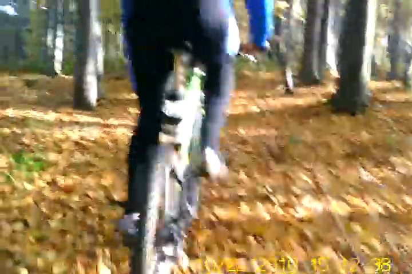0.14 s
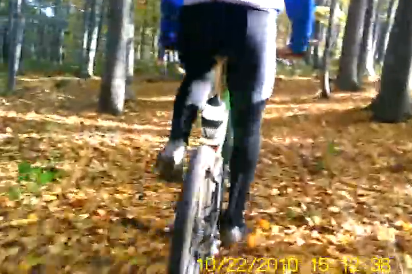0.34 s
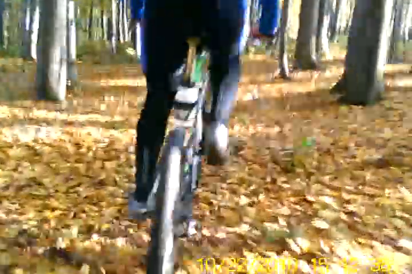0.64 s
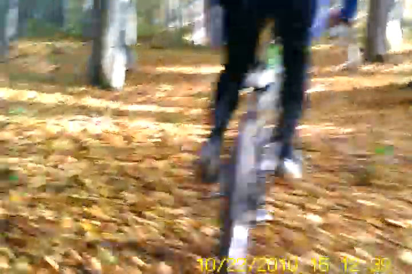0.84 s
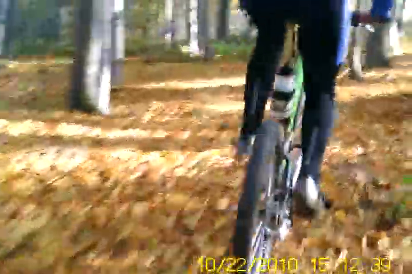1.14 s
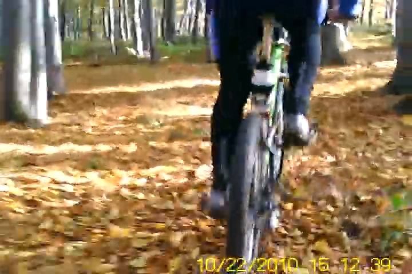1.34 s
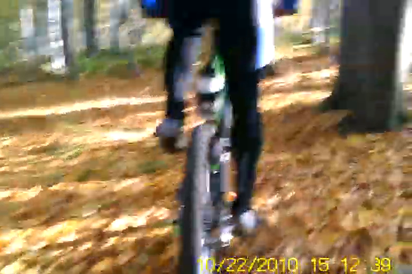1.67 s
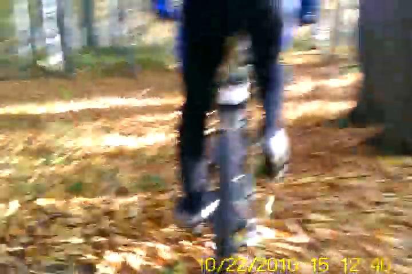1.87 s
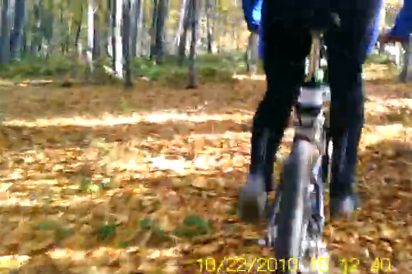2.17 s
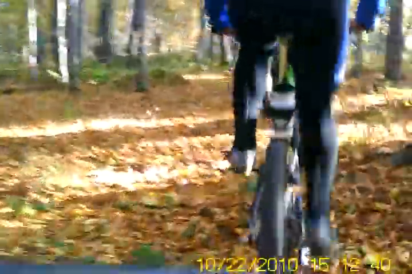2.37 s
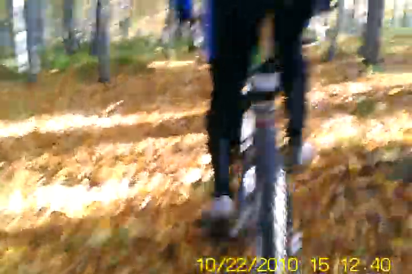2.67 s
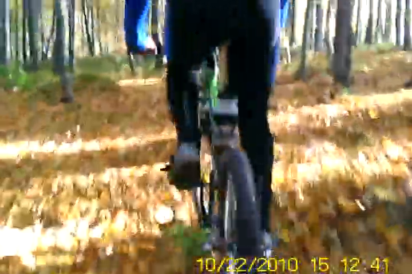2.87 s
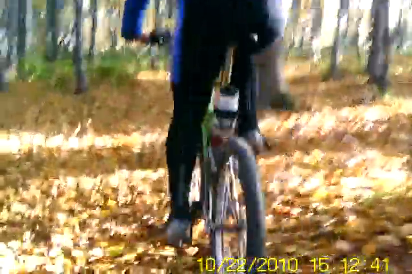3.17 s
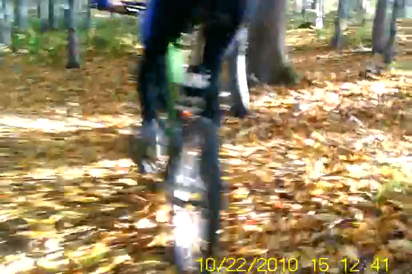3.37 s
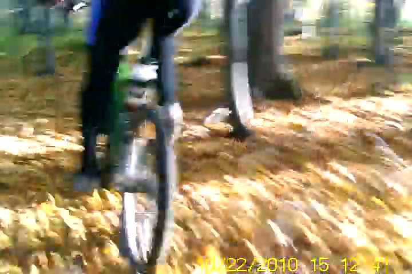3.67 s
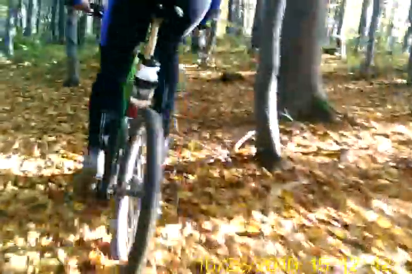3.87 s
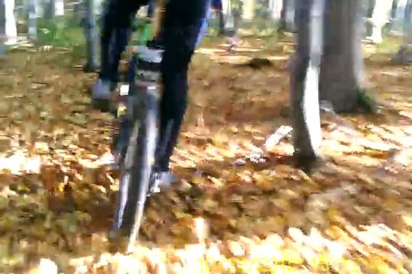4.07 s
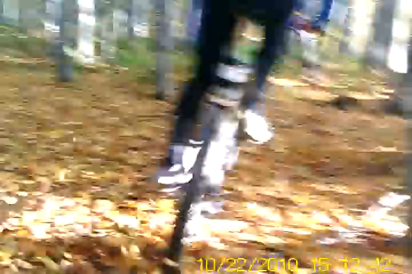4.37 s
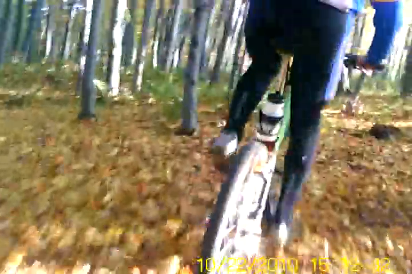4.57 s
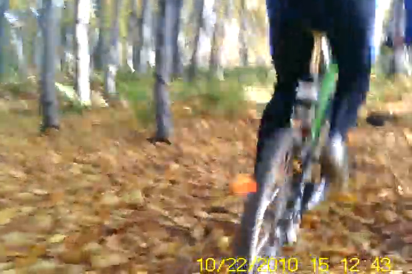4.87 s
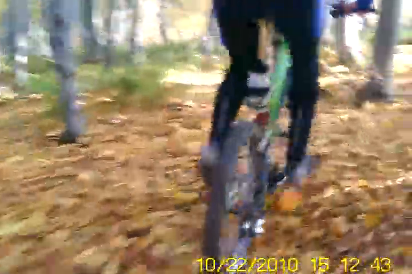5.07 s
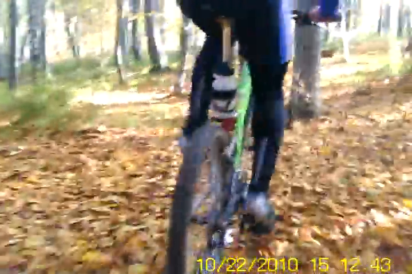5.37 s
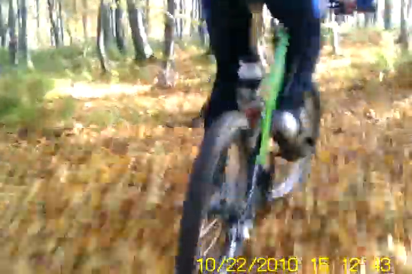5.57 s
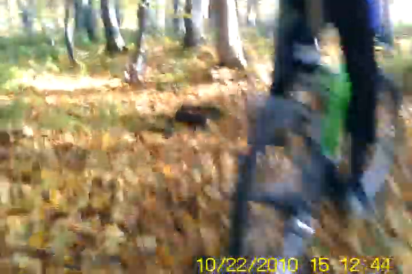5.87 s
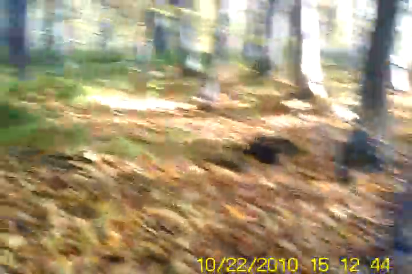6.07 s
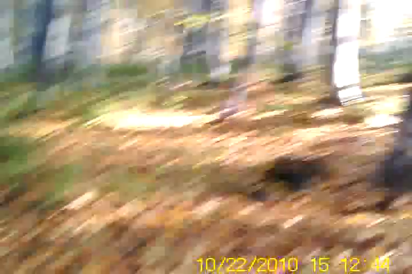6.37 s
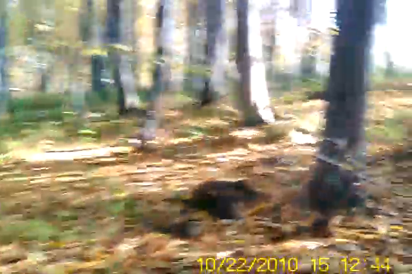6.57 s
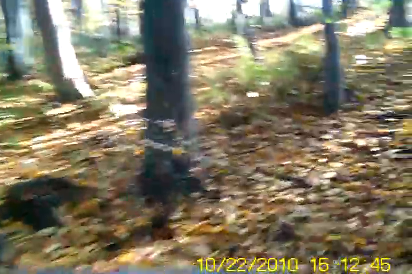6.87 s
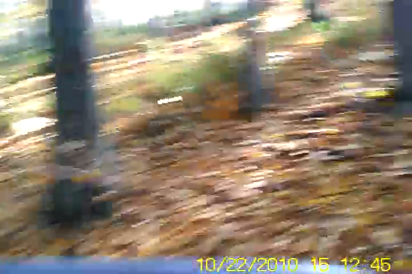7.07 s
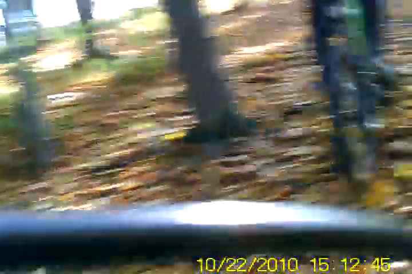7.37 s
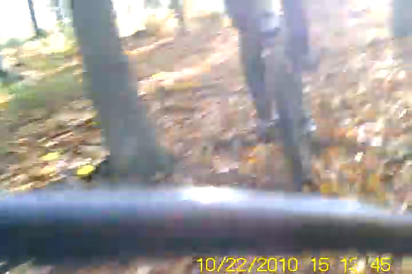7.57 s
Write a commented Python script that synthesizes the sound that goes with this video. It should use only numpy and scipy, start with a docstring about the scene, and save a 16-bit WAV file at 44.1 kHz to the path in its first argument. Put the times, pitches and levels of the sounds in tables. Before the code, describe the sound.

A mountain bike rolls over a woodland trail thick with dry leaves, heard from a small camera on the bike. Fine crackling and rustling run over low rumble, while hard hollow plastic knocks hit two or three times a second. After a heavy jolt the sound drops suddenly, then swells back over a second or so. Knocks return in clusters, with booming thumps later.

```python
"""On a woodland trail deep in dry leaves, a small camera rides on a mountain bike, its microphone behind plastic.
Close below, tyres crush the leaves: random tiny snaps, coloured by the case, make a fine crackle over noise rumble.
Bumps rattle the case in its mount: short ringing modes knock hollowly, overload the microphone and duck its gain.
Jolts push slow swells of pressure with a scuff and a boom; a faint electronic whine lies behind.
Once the trail sound drops abruptly, then swells back over a second or so."""
import sys
import numpy as np
from scipy import signal
from scipy.fft import rfft, irfft
from scipy.io import wavfile
from scipy.ndimage import uniform_filter1d

SR = 44100
rng = np.random.default_rng(int(sys.argv[2]) if len(sys.argv) > 2 else 0)


def unload_wav(signal):
    """Save mono or channel-first audio to the path in sys.argv[1] as 16-bit WAV at rate SR, clipped to [-1, 1]."""
    wavfile.write(
        sys.argv[1],
        SR,
        np.round(np.clip(np.atleast_2d(signal).T, -1, 1) * 32767).astype(np.int16),
    )


N = 340893
TIME = np.arange(N) / SR


def undb(db):
    """Decibels to gain."""
    return 10 ** (np.asarray(db) / 20)


def add(track, start_s, sound):
    """Mix a sound into the track from start_s on."""
    start = max(int(start_s * SR), 0)
    part = track[start:start + len(sound)]
    part += sound[:len(part)]


def unit(x):
    """Scale to rms 1."""
    return x / np.std(x)


def controls(table):
    """Join (time, value, ..) rows by straight lines, one track for each value column."""
    times, *columns = np.transpose(table)
    return np.array([np.interp(TIME, times, column) for column in columns])


def colour(x, outline, resonances=()):
    """Shape a spectrum by a (Hz, dB) outline and by (Hz, width Hz, dB) resonances."""
    hz = np.maximum(np.arange(N // 2 + 1) * SR / N, 1)
    at_hz, at_db = np.transpose(outline)
    db = np.interp(np.log(hz), np.log(at_hz), at_db)
    for centre, width, lift in resonances:
        db = db + lift / (1 + (2 * (hz - centre) / width) ** 2)
    return irfft(rfft(x) * undb(db), N)


def cut(x, hz, kind, order):
    """Butterworth low-pass, high-pass or band-pass."""
    sos = signal.butter(order, hz, kind, fs=SR, output="sos")
    return signal.sosfilt(sos, x)


def walk(rate):
    """Random levels held 1 / rate seconds, then smoothed by two moving averages."""
    hold = int(SR / rate)
    held = np.repeat(rng.standard_normal(N // hold + 1), hold)
    smooth = uniform_filter1d(uniform_filter1d(held, hold), hold)
    return 2.02 * smooth[:N]


def snaps(rate, spread_db):
    """Random tiny fractures, rate a second: many weak ones and a few strong; rms 1."""
    happens = rng.random(N) < rate / SR
    size = np.minimum(rng.exponential(size=N), 6)
    sign = rng.choice([-1, 1], N)
    return unit(happens * sign * undb(spread_db * size))


def rattle(rate, spread_db, ring):
    """Random light blows, rate a second, that all sound one ring; rms 1."""
    return unit(signal.fftconvolve(snaps(rate, spread_db), ring)[:N])


# the abrupt drop: start, fall time, time constant of the return; then nominal depth for each layer
DROP_AT_S, DROP_FALL_S, DROP_RECOVER_S = 2.595, 0.012, 0.54
DROP_LEAF_DB, DROP_RUMBLE_DB, DROP_WIND_DB, DROP_WHINE_DB = 25, 30, 13, 9


def drop():
    """Share of the abrupt drop in level, 0-1: a quick fall and a slow exponential return."""
    since = np.maximum(TIME - DROP_AT_S, 0)
    return np.minimum(since / DROP_FALL_S, 1) * np.exp(-since / DROP_RECOVER_S)


def whine(dropped):
    """A faint thin electronic whine: a 5600 Hz sine whose phase wanders."""
    sine = np.sin(2 * np.pi * 5600 * TIME + 0.5 * walk(25))
    return undb(-63) * np.sqrt(2) * sine * undb(-DROP_WHINE_DB * dropped)


# low end of the ride: (time [s], relative trail rumble level [dB], relative wind buffet level [dB])
SHAKE = [(0, -26, -37), (.2, -23, -27.5), (.42, -16.5, -22.5), (.5, -22, -31.5), (.85, -24, -26.5),
         (1.1, -24, -31), (1.8, -26.5, -23.5), (2.4, -26.5, -36), (2.9, -34, -34.5), (3.7, -41.5, -35),
         (4.3, -34.5, -36), (4.9, -39, -40), (5.5, -42, -34), (6.3, -46.5, -31.5), (6.55, -32.5, -35),
         (6.72, -45, -31.5), (7.3, -50, -36.5), (7.73, -40.5, -27)]
# spectrum of the shaken frame: (frequency [Hz], relative level [dB])
RUMBLE_COLOUR = [(40, -5.5), (90, -0.5), (140, 0.5), (200, -2.5), (280, -8.5), (400, -13.5), (600, -21.5),
                 (1000, -28.5), (2000, -67)]
# spectrum of the wind at the microphone: (frequency [Hz], relative level [dB])
WIND_COLOUR = [(6, 13), (15, 11.5), (30, -3), (60, -0.5), (100, -9), (200, -22.5), (400, -49)]


def rumble(dropped):
    """The rough trail shakes the frame, and eddies of air buffet the microphone: two low noises."""
    rumble_db, buffet_db = controls(SHAKE)
    rumble_db = rumble_db - DROP_RUMBLE_DB * dropped
    buffet_db = buffet_db - DROP_WIND_DB * dropped
    roughness_db = 1.5 * walk(30)  # shared by both noises
    shake = unit(colour(rng.standard_normal(N), RUMBLE_COLOUR))
    eddies = unit(colour(rng.standard_normal(N), WIND_COLOUR))
    shake = shake * undb(rumble_db + 1.0 + roughness_db)
    eddies = eddies * undb(buffet_db + 7.5 + roughness_db)
    return shake + eddies


# leaf bed giving way under the tyres: (time [s], relative crunch level [dB], relative sizzle level [dB])
LEAF_BED = [(0, -38.5, -44.5), (.15, -35.5, -40), (.42, -31, -36), (.47, -34.5, -41), (.85, -37, -43),
            (1.0, -35.5, -42.5), (1.9, -37.5, -45.5), (2.55, -36.5, -42), (3.1, -40, -46),
            (3.85, -41.5, -46), (4.1, -39.5, -43.5), (4.6, -42.5, -47), (5.0, -43.5, -49),
            (5.4, -40.5, -44.5), (6.25, -40, -44.5), (6.6, -35.5, -40), (7.12, -36.5, -38),
            (7.73, -36, -43.5)]


def leaf_levels(dropped):
    """Crunch and sizzle levels along the trail, lowered by the drop."""
    return controls(LEAF_BED) - DROP_LEAF_DB * dropped


# spectrum of the crushed leaves: (frequency [Hz], relative level [dB])
LEAF_COLOUR = [(350, -8), (600, -1), (668, -4.5), (957, 1.5), (1510, 2), (1660, 6), (2410, -13),
               (2880, -3.5), (3060, -7), (4710, -14), (6500, -13.5), (7330, -7.5), (8880, -13.5),
               (10000, -12.5), (10500, -19.5), (13600, -51), (22000, -120)]
# air resonances of the case in front of the microphone: (frequency [Hz], width [Hz], lift [dB])
CAVITY = [(1494, 130, 6), (1880, 200, -6.5), (2370, 930, 2), (3040, 320, 4.5), (4790, 600, -5.5),
          (5340, 260, -3), (6210, 260, 5), (7240, 460, 5)]


def leaves(crunch_db, sizzle_db):
    """Leaves fold under the tyres with a crunch and splinter with a finer sizzle, clump by clump."""
    clumps_db = 1.1 * walk(35)
    folds = colour(snaps(rate=3000, spread_db=1.0), LEAF_COLOUR, CAVITY)
    splinters = colour(snaps(rate=10000, spread_db=3.0), LEAF_COLOUR, CAVITY)
    crunch = unit(cut(folds, 3620, "low", order=6)) * undb(crunch_db - 2.65)
    sizzle = unit(cut(splinters, 3490, "high", order=6)) * undb(sizzle_db + 0.88)
    rustle = (crunch + sizzle) * undb(clumps_db)
    # the microphone takes in very little of the highest treble
    mic_top = signal.ellip(8, 0.3, 60, 10700, fs=SR, output="sos")
    below = signal.sosfilt(mic_top, rustle)
    return below + undb(-16) * cut(rustle, 11550, "low", order=16)


# modes of the case, lowest first (thud, main shell, side wall, two upper ones):
# (frequency at pitch ratio 1 [Hz], relative level [dB], time to fall 60 dB [s], polarity [sign])
CASE = [(690, 0, 0.0032, 1), (1319, 0.3, 0.0099, -1), (1944, -2, 0.0087, 1), (3043, -1.5, 0.0065, 1),
        (4836, -17, 0.0067, -1)]


def case_ring(pitch, hardness, wall_db, thud_db):
    """One blow on the case: its modes swell during the contact and die in about ten milliseconds."""
    contact_s = 0.00043
    t = np.arange(SR // 30) / SR
    ring = 0
    # where the blow lands decides how much the thud and the side wall take part
    places_db = (thud_db, 0, wall_db, 0, 0)
    for (hz, db, t60, polarity), place_db in zip(CASE, places_db):
        octaves_up = max(np.log2(hz / 1400), 0)
        lift_db = 0.49 * hardness * octaves_up  # a harder blow lifts the upper modes
        gain = np.sign(polarity) * undb(db + place_db + lift_db)
        decay = np.exp(-np.log(1000) * t / t60)
        ring = ring + gain * np.sin(2 * np.pi * hz * pitch * t) * decay
    return ring * (1 - np.exp(-t / contact_s))


# heavy jolts that push air against the microphone:
# (time [s], pressure before gain control [full scale], rise and fall constant [s], scuff level [dB])
JOLTS = [(2.568, .76, 0.011, -28), (2.783, -.1, 0.011, -42.5), (2.998, -0.15, 0.0047, -42),
         (3.177, 0.32, 0.018, -41), (3.273, -0.26, 0.032, -55), (3.672, -0.31, 0.0054, -21),
         (3.81, 0.31, 0.013, -37.5), (5.442, 0.67, .011, -28), (5.54, -0.91, .014, -34.5),
         (5.607, 0.24, 0.035, -61), (5.996, 0.39, 0.0096, -31), (6.595, 0.18, 0.0066, -28.5),
         (6.632, -0.72, 0.011, -36), (7.035, -0.21, 0.017, -31.5), (7.427, -.56, 0.0064, -19),
         (7.666, -0.088, 0.0013, -26)]
# the boom of the frame: level above the scuff, decay time constant
BOOM_DB, BOOM_DECAY_S = -2, 0.02


def jolts():
    """Each jolt is a swell of pressure; around its crest the case scuffs its mount, then the frame booms."""
    swell, rub, shudder = np.zeros((3, N))
    boom_decay = np.exp(-np.arange(SR // 4) / SR / BOOM_DECAY_S)
    for crest_s, pressure, length_s, scuff_db in JOLTS:
        shape = np.exp(-np.minimum(np.abs(TIME - crest_s) / length_s, 20))
        swell += pressure * shape
        rub += undb(scuff_db) * shape
        add(shudder, crest_s, undb(scuff_db + BOOM_DB) * boom_decay)
    scuff = rattle(2000, 1.8, case_ring(1, 3, -3, -2))
    boom = unit(colour(rng.standard_normal(N), RUMBLE_COLOUR))
    return swell + rub * scuff + shudder * boom


def chatter(crunch_db):
    """Between the knocks the loose case keeps ticking lightly, now dull, now sharp."""
    dull = rattle(40, 2.7, case_ring(0.97, -2, 4, -3))
    sharp = rattle(45, 2.9, case_ring(1.04, 5, -6, -6))
    return (dull + undb(0.5) * sharp) * undb(crunch_db - 8.5)


# a blow nearer the side wall rings lower and sounds that wall more:
# pitch ratio at which the wall is neutral, dB per unit of pitch ratio, limit in dB
WALL_NEUTRAL_PITCH, WALL_DB_PER_PITCH, WALL_MAX_DB = 1.0226, 125, 18.5
# case knocking in its mount:
# (time [s], strength [dB], pitch [ratio], hardness [relative, higher is brighter], thud level [dB])
KNOCKS = [(0.0525, -5.5, 0.97, 2.5, -2), (0.1489, -20.5, 0.98, 3, 17.5), (0.3936, -8, 1.06, -8, 5),
          (0.4323, 4.5, 1.02, 7.5, -15), (0.4558, -1, 0.99, 1, -14), (0.6468, 1, 1.027, 1.5, -24),
          (0.8667, 0, 1.01, 7.5, -23), (0.9688, 3.7, 1.07, 9.5, 9), (1.0778, 0.5, 1.004, 3.5, -16),
          (1.2347, -7.5, 1, 11.5, 14), (1.333, -1.5, 1.025, 8, -13), (1.5193, -21, 0.95, 8, 11),
          (1.5461, -11.5, 0.92, 12.5, 17.5), (1.5681, -17, 0.94, 2, -2), (1.7423, -7, 0.94, -1, 6),
          (1.9066, -1, 1, 4, -3), (2.093, -2, 1.013, 7.5, 1.5), (2.1777, -3, 1.07, 9.5, 12.5),
          (2.3609, -2.5, 0.97, 3.5, -2), (2.4635, -3.5, 0.99, 2, -6), (2.7184, -31.5, .92, -1, 1),
          (2.9456, -15, .96, 2.5, -1), (2.9975, -17.5, 0.97, -7, 2), (3.0298, -29, 0.99, -8, 2),
          (3.1774, -30, 0.99, 8, 13), (3.229, -24, 0.93, -2, -8), (3.4049, -22, 0.94, -18, 3),
          (3.592, -3, 1.05, 1, -4), (3.636, -7, 1.006, 1.5, -3), (3.6712, -12, 0.92, 3.5, 8),
          (3.8656, -8, 0.97, 2.5, 1), (3.9602, -4, 1.005, 0.5, -8), (4.2273, -3, 1.015, -2.5, -14),
          (4.286, -26, 0.84, .5, -5), (4.2998, 1.5, 1.02, 1, -14), (4.4085, 5, 1.008, 3.5, -15),
          (4.509, 2.5, 1.01, 3, -9), (4.6795, -2, 1.004, 0, -8), (4.7583, -3, 1.005, 1.5, -8),
          (4.8618, -1.5, 0.98, 3.5, -6), (5.0116, -28.5, 0.94, 8, 13), (5.2276, -17, 1.01, -17, -5),
          (5.4126, -17.5, 1.06, 6.5, 7.5), (5.4387, -19.5, 0.99, 5.5, 8), (5.683, -11.5, 0.91, 5.5, 7),
          (5.9978, -7.5, 0.98, 5.5, 4), (6.1105, -6, 0.96, 2, -1), (6.236, -2.5, 1.016, -7.5, -16),
          (6.343, -2, 1.003, -3, -8), (6.4402, -6, 0.98, 1.5, 0.5), (6.5923, -24, 0.79, 10.5, 10),
          (6.6828, -18.5, 0.93, -10, 4), (6.7572, -13.5, 1.04, -14, 5), (7.4286, -1, 1.1, 5.5, -10),
          (7.4398, -12.5, 0.87, 3.5, 13), (7.6665, -24.5, 1, 6, 14)]


def knocks():
    """Bumps knock the case on its mount; harder blows crack more, and a faint shiver follows each."""
    out = np.zeros(N)
    t = np.arange(SR // 30) / SR
    for hit_s, db, pitch, hardness, thud_db in KNOCKS:
        wall_db = min(WALL_DB_PER_PITCH * (WALL_NEUTRAL_PITCH - pitch), WALL_MAX_DB)
        # rough plastic on plastic: about a millisecond of grit that grows quickly with hardness
        grit = cut(rng.standard_normal(len(t)), [1200, 9500], "band", order=2)
        grit = grit * (np.exp(-t / 0.00073) - np.exp(-t / 0.00022))
        crack = undb(3.11 * hardness - 17.0) * grit
        ring = case_ring(pitch, hardness, wall_db, thud_db)
        add(out, hit_s, undb(db) * (ring + crack))
    shiver = rng.standard_normal(len(t)) * np.exp(-t / 0.0056)
    shiver = shiver / np.linalg.norm(shiver)
    return out + undb(-23.0) * signal.fftconvolve(out, shiver)[:N]


def scene():
    """Everything that reaches the one microphone."""
    dropped = drop()
    crunch_db, sizzle_db = leaf_levels(dropped)
    trail = rumble(dropped) + leaves(crunch_db, sizzle_db) + jolts()
    case = chatter(crunch_db) + knocks()
    return (whine(dropped) + trail + case)[None]


# gain control: level at which it acts, dB of ducking per dB over it, deepest duck, reaction, recovery
DUCK_ABOVE_DB, DUCK_SLOPE, DUCK_MAX_DB, DUCK_LAG_S, DUCK_RECOVER_DB_PER_S = -9, 1, 6, 0.004, 28.5


def gain_control(x):
    """Sharp peaks turn the gain down a moment later; it climbs back at a steady rate in dB."""
    # bass is left out of the level, averaged over a millisecond
    power = uniform_filter1d(cut(x, 400, "high", order=2) ** 2, SR // 1000)
    level_db = 10 * np.log10(np.maximum(power, 1e-12))
    wanted_db = np.clip(DUCK_SLOPE * (level_db - DUCK_ABOVE_DB), 0, DUCK_MAX_DB)
    # a running maximum against a rising line leaves a duck that fades steadily
    climb_db = DUCK_RECOVER_DB_PER_S * TIME
    duck_db = np.maximum.accumulate(wanted_db + climb_db) - climb_db
    smooth_db = uniform_filter1d(duck_db, SR // 300)
    late_db = np.interp(TIME - DUCK_LAG_S, TIME, smooth_db)
    return x * undb(-late_db)


def record(dry):
    """The gain ducks late, so the input flattens the hardest knocks; the top is dulled, then cut."""
    ceiling = 0.75  # of full scale, at the input
    ridden = gain_control(dry[0])[None]
    clipped = ridden / (1 + (ridden / ceiling) ** 10) ** (1 / 10)
    dulled = colour(clipped, [(10400, 0), (11200, -12.0), (13000, -16), (16000, -23)])
    top_cut = signal.ellip(8, 0.2, 80, 16300, fs=SR, output="sos")
    return signal.sosfilt(top_cut, dulled)


dry = scene()
out = record(dry)
unload_wav(out)
```